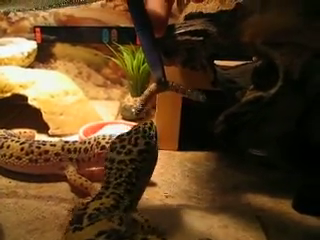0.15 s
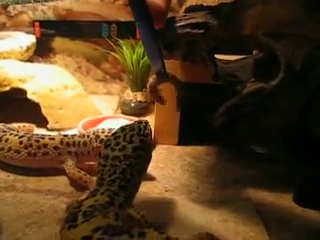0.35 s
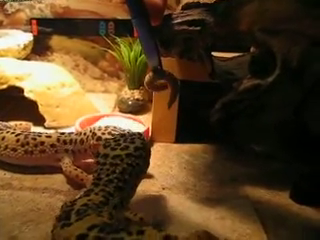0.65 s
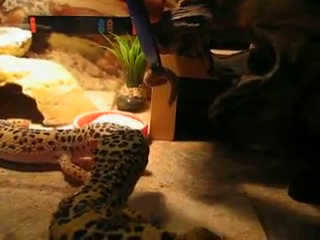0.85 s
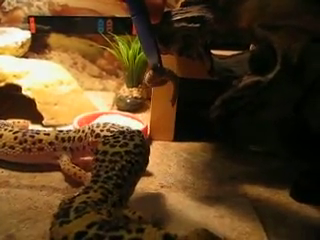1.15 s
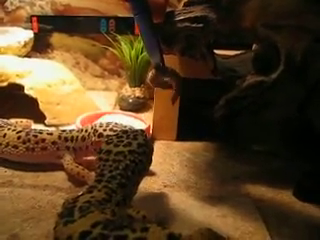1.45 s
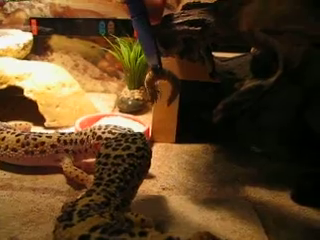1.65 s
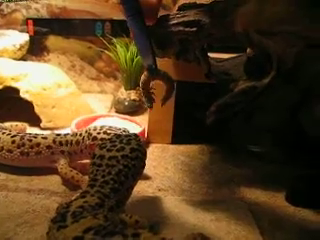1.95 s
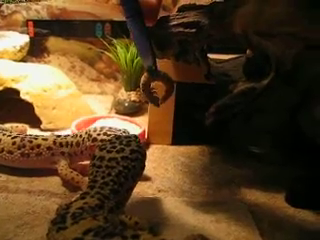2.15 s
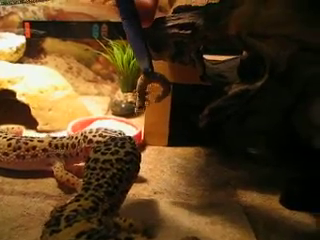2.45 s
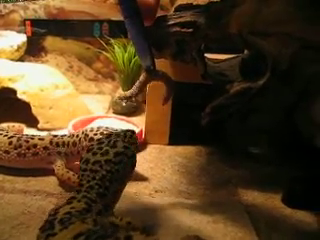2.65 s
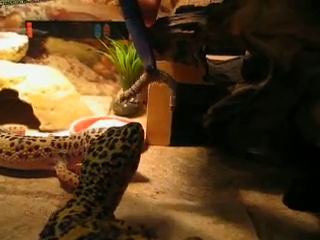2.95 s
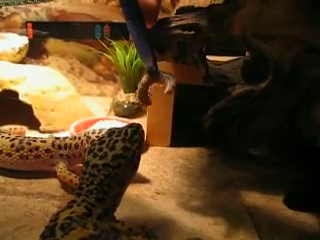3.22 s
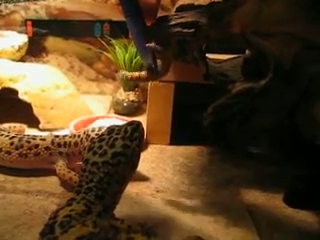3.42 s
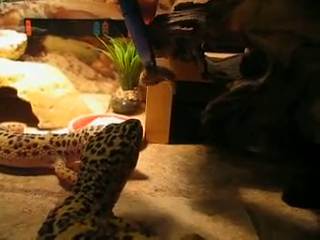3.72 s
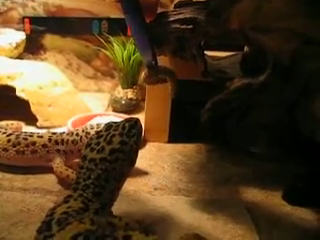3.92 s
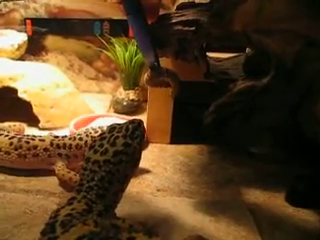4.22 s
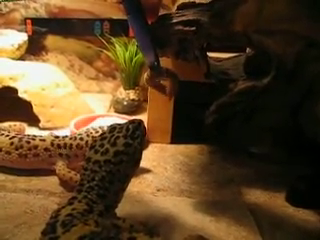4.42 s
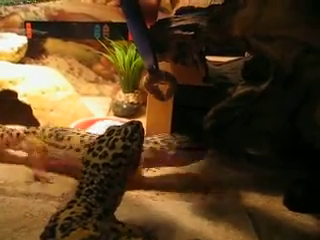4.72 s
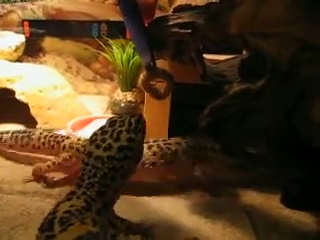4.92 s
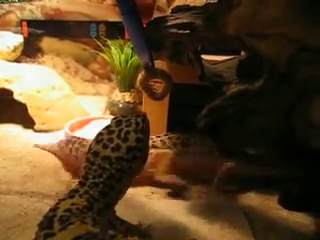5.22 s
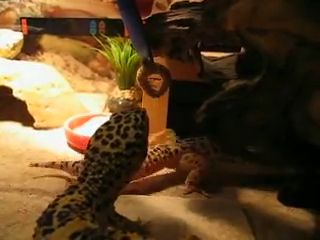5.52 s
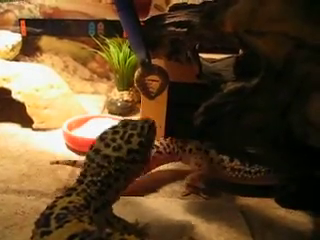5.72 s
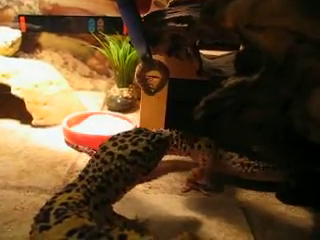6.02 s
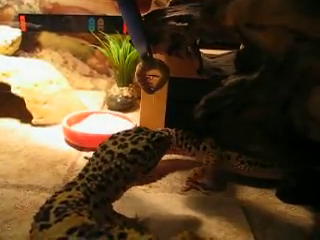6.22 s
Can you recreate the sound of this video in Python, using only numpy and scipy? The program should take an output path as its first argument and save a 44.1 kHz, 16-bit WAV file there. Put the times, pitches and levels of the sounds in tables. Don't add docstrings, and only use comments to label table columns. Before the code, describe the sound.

A small indoor space with a steady low pump hum, a thin whine and hiss. Scattered clacks, ticks and hollow thumps come as light objects are handled near a tank of lizards. A sharp clack lands around 1.35 seconds, a quieter stretch follows, a ringing knock comes at 3, then a dense loud tumble of thumps and rustling after 4. Single knocks follow to the end. Small, slightly dull mono microphone, short room echo.

```python
import sys
import numpy as np
from scipy import signal
from scipy.fft import rfft, irfft, next_fast_len
from scipy.io import wavfile

SR = 44100
rng = np.random.default_rng(int(sys.argv[2]) if len(sys.argv) > 2 else 0)


def int16_out(signal):
    q = np.round(np.clip(np.atleast_2d(signal).T, -1, 1) * 32767)
    wavfile.write(sys.argv[1], SR, q.astype(np.int16))


def makeup_ratio(level_db):
    decades = np.asarray(level_db, float) / 20
    return 10 ** decades


N = 280520


def evened(x):
    return x / np.sqrt(np.mean(x ** 2) + 1e-20)


def read_spectrum(points, hz):
    point_hz, value = np.transpose(points)
    return np.interp(np.log(hz + 1), np.log(point_hz + 1), value)


def filtered(x, spectrum):
    size = next_fast_len(N)
    gain = makeup_ratio(read_spectrum(spectrum, np.fft.rfftfreq(size, 1 / SR)))
    return irfft(rfft(x, size) * gain, size)[..., :N]


def ring(hz, t60, rise):
    t = np.arange(4096) / SR
    envelope = makeup_ratio(-60 * t / t60) * (1 - np.exp(-t / rise))
    return evened(envelope * np.sin(2 * np.pi * hz * t))


def band(lo_hz, hi_hz, rise):
    t = np.arange(4096) / SR
    steep = signal.butter(4, [lo_hz, hi_hz], "band", fs=SR, output="sos")
    return evened(signal.sosfilt(steep, np.exp(-t / rise)))


# start_s [s], echo_decay_factor [ratio]
SPOT_IN_ROOM = [(0, 0.86), (1.4, 0.83), (1.6, 0.7), (1.8, .57), (2.5, 0.69), (3.0, 0.79), (3.45, 0.58),
                (4.0, 0.77), (4.5, 0.84), (5.0, 0.69), (5.9, .68), (6.36, .78)]


def lingering(s, db, factor, per_db):
    return factor * np.interp(s, *np.transpose(SPOT_IN_ROOM)) - per_db * (db + 34.5)


def echoes(decay_factor, direct_db):
    length, gap_s, build_s = 16384, 0.00037, 0.00029
    t = np.arange(length) / SR
    dense = np.clip(.03 + t / .12, 0, .3)
    shape = (len(decay_factor), length)
    present = rng.random(shape) < dense
    taps = rng.standard_normal(shape) * present * np.sqrt(0.15 / dense)
    taps *= 1 - np.exp(-np.maximum(t - gap_s, 0) / build_s)
    taps[:, 0] = makeup_ratio(direct_db + 15.5 * (1 - decay_factor))
    return signal.stft(taps, SR, nperseg=256)


# pitch_hz [Hz], t60_s [s]
ROOM_DECAY = [(80, 0.24), (300, 0.25), (1000, 0.21), (3000, 0.17), (7000, 0.21), (12000, 0.15)]


def placed(events, direct_db):
    decay_factor = np.clip([event[2] for event in events], .2, 4)
    hz, t, taps = echoes(decay_factor, direct_db)
    t60 = read_spectrum(ROOM_DECAY, hz)[:, None]
    early = makeup_ratio(-60 * t / t60 / decay_factor[:, None, None])
    late = makeup_ratio(-17.5 - 60 * t / t60 / 1.54)
    tails = signal.istft(taps * (early + late), SR, nperseg=256)[1]
    out = np.zeros(N)
    for (s, db, _, sound), tail in zip(events, tails):
        heard = signal.fftconvolve(sound, tail)
        part = out[round(s * SR):][:len(heard)]
        part += (makeup_ratio(db) * heard / abs(heard).max())[:len(part)]
    return out


# pitch_hz [Hz], level_db [dB rms], wobble_width_hz [Hz]
HUM_TONES = [(58.3, -59.5, 2), (119, -62, 6), (233, -56.5, 11.8), (392, -63, 12), (452, -57.5, 6),
             (473, -60, 8), (676, -66.5, 5), (1520, -83, 22), (2020, -104, 45), (6900, -100, 6.9),
             (940.6, -56.2, 0.6), (8100, -71.5, 2)]


def hum():
    t, out = np.arange(N) / SR, np.zeros(N)
    for hz, db, width_hz in HUM_TONES:
        wander = np.cumsum(rng.standard_normal(N)) * np.sqrt(2 * np.pi * width_hz / SR)
        out += makeup_ratio(db) * np.sqrt(2) * np.sin(2 * np.pi * hz * t + wander)
    return out


# pitch_hz [Hz], level_db [dB per Hz]
FLOOR_SPECTRUM = [(12, -22), (32, -12), (80, -15), (170, -24), (236, 0.5), (309, -6.5), (450, -0.5),
                  (700, -12), (1000, -15), (1120, -23), (1430, -14), (3030, -22), (8390, -27), (10700, -25),
                  (22000, -35)]


def floor():
    return makeup_ratio(-50) * evened(filtered(rng.standard_normal(N), FLOOR_SPECTRUM))


# start_s [s], effort_db [dB]
EFFORT_CURVE = [(0, -54), (1.0, -66.5), (1.6, -54.5), (2.1, -54), (2.66, -53.5), (2.78, -49), (3.0, -50),
                (3.1, -48.5), (3.43, -53), (3.63, -44.5), (4.0, -51), (4.16, -46), (4.25, -33), (4.4, -39),
                (4.69, -40), (4.84, -53), (5.6, -58.5), (6.36, -51)]
# level_db at middling effort [dB], slope [dB per dB]
FOLLOW_EFFORT = [
    (-50, 0.98),
    (-55, 0.71),
    (-56, .5),
]
# peak_s [s], level_db [dB], rustle_above_rumble_db [dB]
JOLT_EVENTS = [(.14, -65, -7), (.32, -46, -19), (.56, -54.5, -11), (.73, -45.5, -7), (1.13, -41.5, 1),
               (1.38, -48, 9.5), (3.03, -50.5, -23), (3.66, -49.5, -18), (3.85, -52, -20), (4.13, -47, -17),
               (4.41, -40.5, 0), (4.34, -51, -1), (4.89, -47, -14), (5.19, -46.5, -6), (5.7, -48, -8),
               (6.18, -43, -15)]


def stirring(t):
    rise_db_per_s, fall_db_per_s, shuffle_db = 305, 245, -1.5
    steps = t[::64]
    effort_db = np.interp(steps, *np.transpose(EFFORT_CURVE))
    gains = np.array([makeup_ratio(db + slope * (effort_db + 50.5)) for db, slope in FOLLOW_EFFORT])
    for s, db, rustle_db in JOLT_EVENTS:
        swell = makeup_ratio(np.minimum(rise_db_per_s * (steps - s), fall_db_per_s * (s - steps)))
        gains += makeup_ratio(db + np.array([[shuffle_db], [0], [rustle_db]])) * swell
    return [np.interp(t, steps, gain) for gain in gains]


# pitch_hz [Hz], level_db [dB per Hz]
SHUFFLE_SPECTRUM = [(71, -21), (120, -10.5), (183, -9), (249, -1), (317, -8.5), (405, -3), (611, -18.5),
                    (962, -27), (1500, -48), (1950, -72), (3300, -120)]
# pitch_hz [Hz], level_db [dB per Hz]
RUMBLE_SPECTRUM = [(12, -35), (22, -11), (33, -3.5), (45, -2), (70, -11.5), (118, 3.5), (165, -7),
                   (220, -50), (370, -120)]
# pitch_hz [Hz], level_db [dB per Hz]
RUSTLE_SPECTRUM = [(530, -40), (900, 9), (1150, -1), (2100, -6.5), (3000, -7), (4500, -14), (9800, -16.5),
                   (12500, -35), (22000, -40)]


def moves():
    t, out = np.arange(N) / SR, np.zeros(N)
    spectra = SHUFFLE_SPECTRUM, RUMBLE_SPECTRUM, RUSTLE_SPECTRUM
    contacts_per_s, smear_t60_s = (220, 300, 900), (.12, .12, .06)
    for gain, spectrum, per_s, t60 in zip(stirring(t), spectra, contacts_per_s, smear_t60_s):
        strength = makeup_ratio(1.85 * np.minimum(rng.exponential(1, N), 2.5))
        bumps = (rng.random(N) < per_s / SR) * rng.standard_normal(N) * strength
        smear = rng.standard_normal(6000) * makeup_ratio(-60 * t[:6000] / t60)
        out += gain * evened(filtered(signal.fftconvolve(bumps, smear)[:N], spectrum))
    return out


# pitch_hz [Hz], level_db [dB], t60_s [s]
OBJECT_MODES = [(616, -11.5, 0.034), (1093, -62, 0.27), (1600, -13, 0.02), (1810, -11, 0.004),
                (3400, -7.5, 0.0029), (4360, -17.5, 0.0063)]
# start_s [s], level_db [dB peak], hollow_body_db [dB], crack_db [dB]
TUB_KNOCKS = [(.2518, -38.5, 24, -21), (.6858, -40.5, 23, -18.5), (1.1244, -27.5, 0, -34),
              (1.2017, -36.5, 8.5, -32), (1.298, -40, 2, -10), (1.3342, -28, 6, -7), (3.933, -31, -16, -13),
              (4.4149, -31.5, 2, -19), (4.5014, -36.5, 5, -26), (4.5835, -29.5, 8, -33),
              (4.6006, -44, 1, -10), (4.8794, -29, 0, -30), (5.299, -41, -10, -13), (5.615, -32, -1, -34),
              (5.7349, -34.5, -3, -17), (5.803, -36, -0.5, -7), (6.1, -36.5, -6, -28),
              (6.303, -33, -10, -34)]
# start_s [s], level_db [dB peak], hollow_body_db [dB], crack_db [dB]
BOX_KNOCKS = [(.1196, -35, 9, -25), (0.7345, -26.5, -1, -4), (0.9308, -32, 2.5, -30),
              (1.513, -29.5, 1.5, -6), (1.535, -27, -7, -27), (2.5027, -33.5, 9, -23), (2.872, -38, 4, -32),
              (2.9038, -31.5, 17, -26), (3.4117, -44, 5, -23), (3.7818, -37, -1, -27),
              (4.052, -38.5, -16, -1), (4.2876, -15, -10, -1.5), (5.017, -25.5, -2, -15),
              (5.158, -24.5, -3, -14), (6.0494, -39, 20, -1), (6.1616, -23.5, -5, -7.5)]
# start_s [s], level_db [dB peak], hollow_body_db [dB], crack_db [dB]
LID_KNOCKS = [(.1455, -26.5, 3, -15), (.3013, -24, -1.5, -10), (.7112, -30, -2, -18), (.852, -27, 2.5, -13),
              (1.0944, -23.5, -5, -6.5), (1.3542, -18, -8, -3.5), (2.163, -37, 3, -31),
              (2.9976, -19.5, 1.5, -15), (3.5583, -44, -5, -21), (4.3743, -21.5, -13, -3),
              (4.6141, -31, -7, -14), (4.6682, -27, -23, -5), (5.004, -27, 3.5, -8)]


def knocks():
    body = band(550, 1000, .00003)
    clack = band(1000, 2500, .00003)
    crack = band(2500, 4100, .00003)
    modes = np.array([makeup_ratio(db) * ring(hz, t60, 0.000086) for hz, db, t60 in OBJECT_MODES])
    events = []
    for object_hz, rows in ((990, TUB_KNOCKS), (1600, BOX_KNOCKS), (1990, LID_KNOCKS)):
        main_mode = .5 * ring(object_hz, 0.013, 0.00064)
        for s, db, body_db, crack_db in rows:
            struck = makeup_ratio(3 * rng.standard_normal(len(modes))) @ modes
            sound = clack + main_mode + struck + makeup_ratio(body_db) * body + makeup_ratio(crack_db + 3) * crack
            events.append((s, db, lingering(s, db, 1.094, 0.00088), sound))
    return placed(events, direct_db=7)


# start_s [s], level_db [dB peak], panel_hz [Hz], deep_thud_db [dB]
PADDED_THUMPS = [(0.12, -31.5, 223, -17), (.243, -43, 385, -11.5), (0.71, -30, 237, -23),
                 (2.209, -35.5, 243, -6), (2.25, -38.5, 229, -7), (2.329, -43, 392, -19),
                 (3.445, -34, 375, -18), (3.559, -33, 330, -18), (3.626, -34, 216, -6),
                 (3.695, -34, 350, -11), (3.783, -32, 235, -4.5), (4.166, -26, 245, -14),
                 (4.198, -31, 244, -13), (4.222, -24, 245, -13), (4.409, -24, 260, -14),
                 (4.498, -22, 393, -7.5), (4.531, -28, 280, -23), (4.868, -30, 380, -4),
                 (5.003, -23, 392, -26), (5.09, -39, 417, -16), (5.152, -27.5, 385, 0),
                 (5.661, -25, 273, -34), (5.712, -37, 256, -20), (6.045, -37, 288, -3)]
# start_s [s], level_db [dB peak], panel_hz [Hz], deep_thud_db [dB]
FIRM_THUMPS = [(0.301, -31, 234, -28), (.734, -31, 467, -20.5), (0.851, -34, 266, -8),
               (0.928, -29, 235, -26), (1.086, -31.5, 220, -19), (1.122, -26.5, 243, -23),
               (1.202, -32.5, 240, -24), (1.292, -34, 250, -27), (1.337, -27.5, 252, -22),
               (1.356, -34, 237, 2), (1.511, -36, 300, -3), (1.54, -34.5, 388, -20),
               (2.592, -36.5, 242, -24), (2.899, -26, 221, -23), (2.9978, -16, 397, -33),
               (3.93, -33, 300, -8), (4.114, -34.5, 258, -6), (4.263, -22.5, 260, 0), (4.275, -31, 266, -5),
               (4.289, -24, 258, -20), (4.368, -22, 250, -19), (4.458, -25, 300, 0),
               (4.577, -27.5, 154, -8), (5.787, -28.5, 264, -9), (6.159, -18.5, 130, -9)]


def thumps():
    deep = band(75, 165, 0.00027)
    panel = band(165, 330, 0.00027)
    upper = band(330, 640, 0.00027)
    events = []
    for upper_db, rows in ((-14.5, PADDED_THUMPS), (-3, FIRM_THUMPS)):
        for s, db, hz, deep_db in rows:
            sound = ring(hz, 0.054, 0.00026) + 0.18 * panel
            sound += makeup_ratio(deep_db) * deep + makeup_ratio(upper_db) * upper
            events.append((s, db, lingering(s, db, 1.19, 0.015), sound))
    return placed(events, direct_db=15)


# start_s [s], level_db [dB peak], pitch_hz [Hz], half_width [octaves]
TICK_EVENTS = [(.129, -40, 9000, 0.42), (0.5497, -33, 9500, 0.24), (.7103, -42, 8250, 0.24),
               (0.735, -33, 4400, .3), (1.0943, -23, 7000, 0.6), (1.3019, -45, 8100, .22),
               (1.354, -17.5, 5300, 0.55), (1.512, -41, 5070, 0.16), (1.543, -42, 5000, .28),
               (2.3012, -43, 6900, .14), (2.5525, -45, 8100, .22), (2.7433, -36.5, 8400, 0.19),
               (2.8554, -45, 8100, .22), (2.9975, -29, 4600, 0.14), (3.1512, -38.5, 7650, .18),
               (4.168, -46, 4960, .25), (4.2896, -12, 4770, 0.13), (4.614, -37.5, 5010, .3),
               (4.669, -27, 4700, 0.1), (4.8793, -39, 5100, .15), (5.004, -34, 4770, .38),
               (5.017, -38, 5500, .2), (5.1402, -42, 7800, .2), (5.1586, -39, 4670, .22),
               (5.506, -46, 8100, .2), (5.6145, -46, 4800, 0.2), (5.8043, -38, 4900, 0.27),
               (6.162, -17, 5050, 0.21)]


def ticks():
    events = []
    for s, db, hz, width in TICK_EVENTS:
        if hz < 6000:
            air_db, air_slope_db = 6.5, -21
            decay_factor = lingering(s, db, 1, .004)
        else:
            air_db, air_slope_db = -15, 47
            decay_factor = lingering(s, min(db, -33), 0.94, -0.03)
        top_hz = min(hz * 2 ** width + 50, 11500)
        snap = band(hz / 2 ** width, top_hz, .00002)
        air = makeup_ratio(air_db + air_slope_db * min(width, .3)) * band(top_hz, 13000, .00002)
        events.append((s, db, decay_factor, snap + air))
    return placed(events, direct_db=7)


# start_s [s], level_db [dB peak], pitch_hz [Hz], t60_s [s]
REBOUND_EVENTS = [(.1478, -33, 2100, .012), (.149, -38, 3100, .01), (.254, -41, 1050, .03),
                  (.3025, -34, 1900, .012), (.7345, -35, 3100, .012), (.736, -34, 1750, .025),
                  (.752, -38, 4400, .008), (.8505, -38, 3600, .01), (.9315, -37, 1800, .01),
                  (1.0985, -30, 7000, .01), (1.0985, -30, 1900, .012), (1.359, -26, 3800, .02),
                  (1.359, -30, 7200, .02), (1.3705, -26, 1000, .02), (1.513, -37, 3580, .012),
                  (1.5375, -32, 1650, .03), (1.539, -37, 2500, .02), (2.1655, -39, 2000, .008),
                  (2.503, -38, 1500, .015), (2.999, -28, 1850, .04), (3.0, -27, 1034, .06),
                  (4.309, -26, 2200, .02), (4.292, -26, 5000, .02), (4.8805, -39, 5200, .008),
                  (5.005, -36, 3500, .01), (5.0175, -36, 6100, .008), (5.0175, -30, 1550, .03),
                  (5.1585, -29, 1700, .05), (5.615, -36, 1750, .012), (5.615, -43, 4800, .006),
                  (5.735, -42, 4700, .008)]


def rebounds():
    return placed([(s, db, .45, ring(hz, t60, .0003)) for s, db, hz, t60 in REBOUND_EVENTS], direct_db=24)


# start_s [s], level_db [dB peak], pitch_hz [Hz], t60_s [s]
PING_EVENTS = [(.154, -38, 1050, 0.033), (.306, -31, 583, 0.053), (.736, -43, 3130, .015),
               (.853, -42, 3200, .015), (1.357, -28.5, 580, 0.021), (1.513, -42, 3580, .015),
               (2.908, -38, 870, 0.03), (2.998, -28, 4980, .008), (2.999, -31, 3480, 0.014),
               (2.999, -24, 1550, 0.035), (3.935, -40, 3450, .015), (4.295, -26.5, 6760, 0.031),
               (4.392, -25, 420, 0.042), (4.43, -26, 295, 0.045), (4.67, -37, 2100, 0.028),
               (5.016, -37, 4940, .012), (5.622, -32.5, 1100, 0.017), (5.742, -35, 1060, .025),
               (6.108, -39, 1050, 0.019), (6.164, -32.5, 2260, 0.027), (6.311, -34, 1046, 0.019),
               (6.163, -31, 5700, 0.01), (6.162, -25.5, 9130, 0.008), (1.3547, -17.5, 1830, .014),
               (3.012, -27, 800, 0.056)]


def pings():
    return placed([(s, db, .6, ring(hz, t60, 0.00081)) for s, db, hz, t60 in PING_EVENTS], direct_db=21)


# start_s [s], level_db [dB peak], pitch_hz [Hz], t60_s [s]
PANEL_NOTES = [(1.513, -33, 330, .03), (2.993, -33, 400, .03), (2.999, -28, 262, .15),
               (3.446, -33, 400, .03), (3.447, -37, 245, .05), (3.559, -31, 278, .05),
               (3.697, -35, 240, .05), (3.782, -33, 245, .07), (3.932, -35, 570, .05),
               (4.415, -34, 850, .04), (4.6, -36, 850, .05), (4.11, -33, 253, .08), (4.165, -29, 256, .08),
               (4.198, -33, 250, .05), (4.223, -28, 248, .1), (4.262, -28, 270, .08),
               (4.282, -28, 520, .05), (4.305, -28, 240, .08), (4.374, -25, 268, .1),
               (4.395, -25, 262, .08), (4.409, -22, 265, .06), (4.461, -25, 300, .04),
               (4.499, -24, 420, .06), (4.527, -29, 380, .04), (4.536, -26, 300, .05), (4.6, -32, 430, .08),
               (4.615, -31, 500, .06), (4.884, -28, 400, .03), (5.668, -31, 270, .05),
               (5.69, -33, 300, .02), (5.724, -34, 200, .04)]


def panel_notes():
    return placed([(s, db, .55, ring(hz, t60, .0015)) for s, db, hz, t60 in PANEL_NOTES], direct_db=24)


# start_s [s], level_db [dB rms]
SWISH_CURVE = [(3.55, -80), (3.68, -58.5), (3.85, -72), (4.1, -70), (4.22, -59), (4.27, -56), (4.42, -54),
               (4.5, -68), (4.57, -54), (4.62, -70), (4.7, -78)]


def swish():
    grains = rng.standard_normal(N) * (rng.random(N) < .15)
    level_db = np.interp(np.arange(N) / SR, *np.transpose(SWISH_CURVE), left=-120, right=-120)
    return makeup_ratio(level_db) * evened(signal.oaconvolve(grains, band(8400, 13000, .00002))[:N])


def scene():
    steady = hum() + floor()
    contacts = moves() + knocks() + thumps() + ticks()
    details = rebounds() + pings() + panel_notes() + swish()
    return (steady + contacts + details)[None]


def top_cut(x):
    return signal.sosfilt(signal.butter(12, 12370, fs=SR, output="sos"), x)


# pitch_hz [Hz], level_db [dB]
MICROPHONE_RESPONSE = [(20, -0.5), (8500, -1.5), (10300, -3.5), (11300, -12.5), (12000, -23.5),
                       (12500, -45), (14000, -90)]


def record(dry):
    mix = filtered(dry, MICROPHONE_RESPONSE)
    return top_cut(mix)


dry = scene()
out = record(dry)
int16_out(out)
```